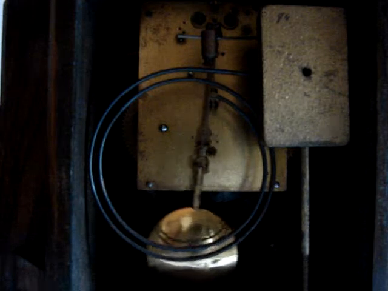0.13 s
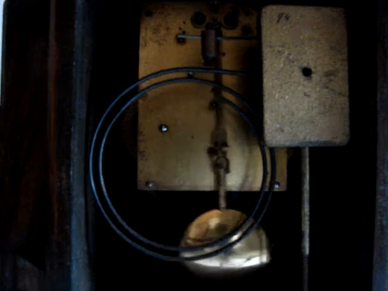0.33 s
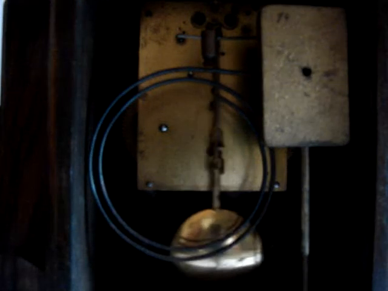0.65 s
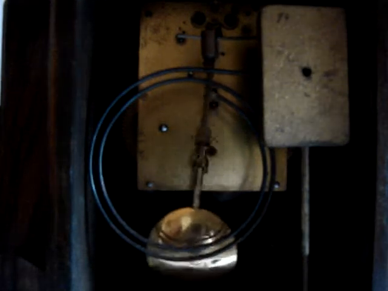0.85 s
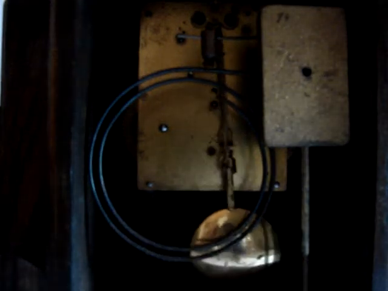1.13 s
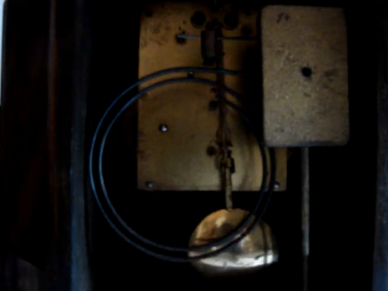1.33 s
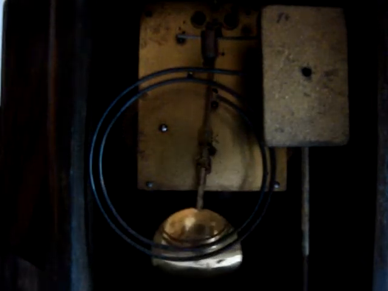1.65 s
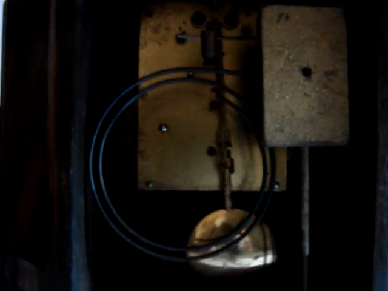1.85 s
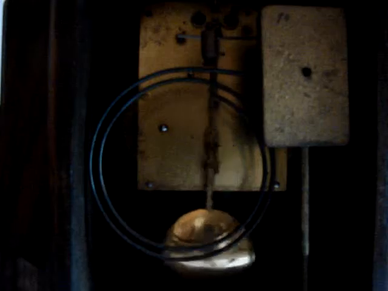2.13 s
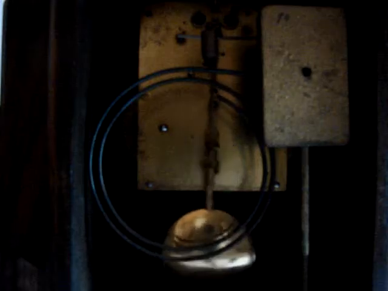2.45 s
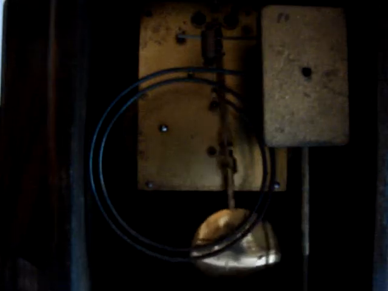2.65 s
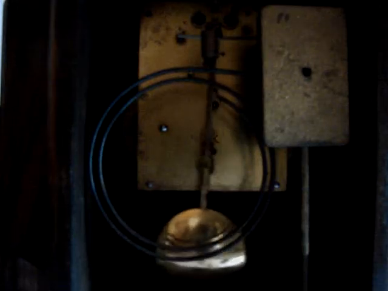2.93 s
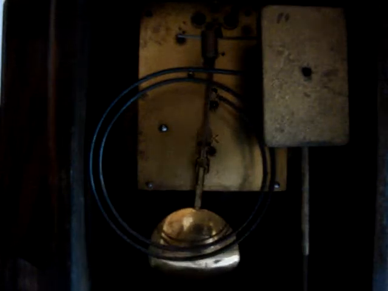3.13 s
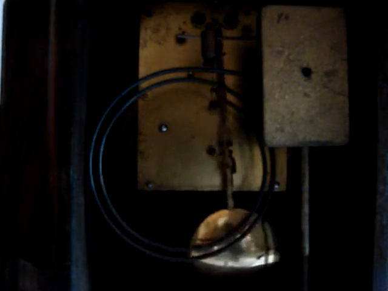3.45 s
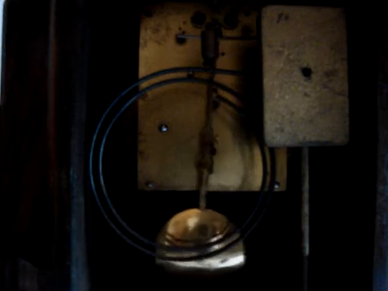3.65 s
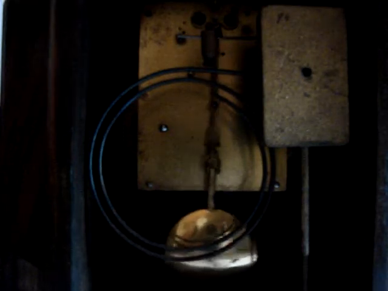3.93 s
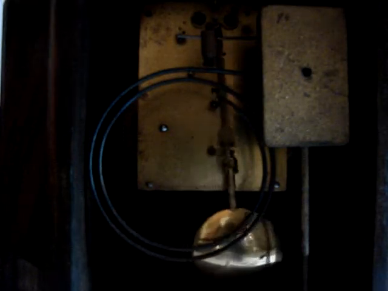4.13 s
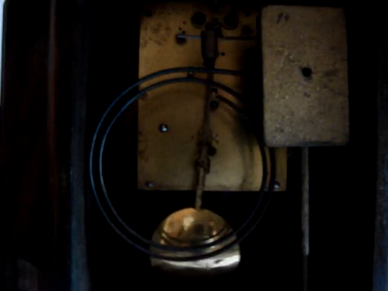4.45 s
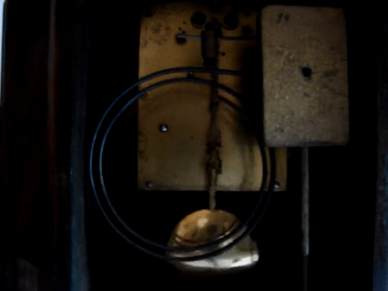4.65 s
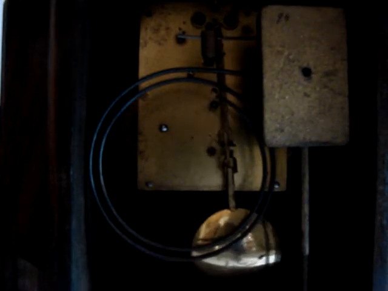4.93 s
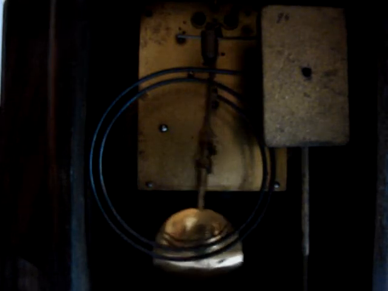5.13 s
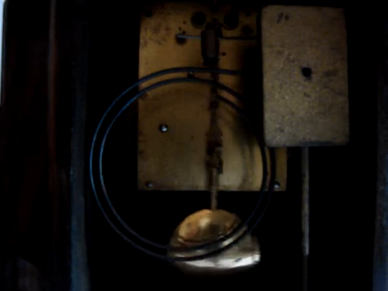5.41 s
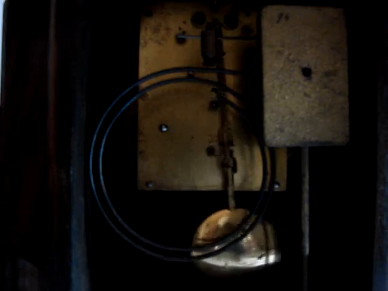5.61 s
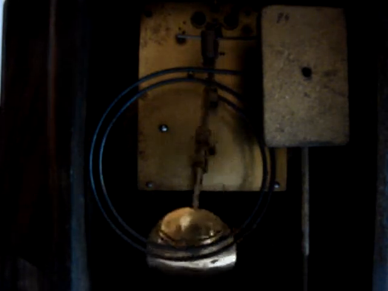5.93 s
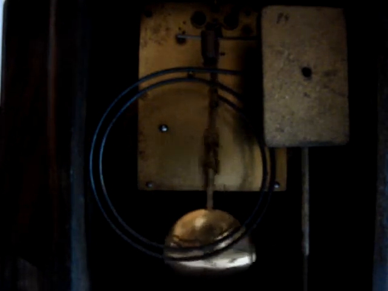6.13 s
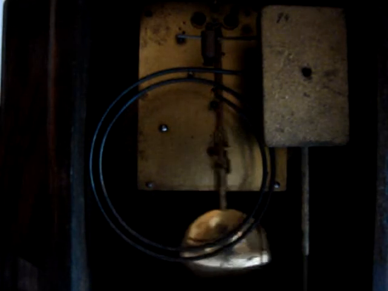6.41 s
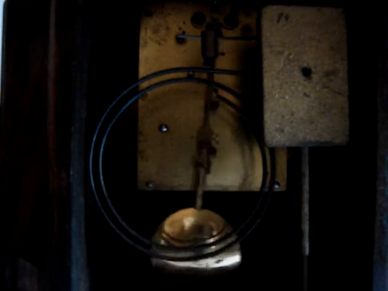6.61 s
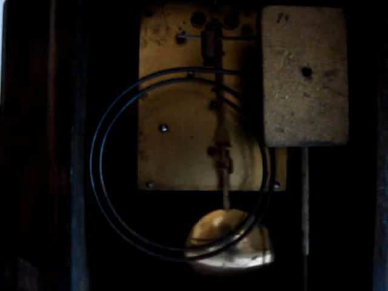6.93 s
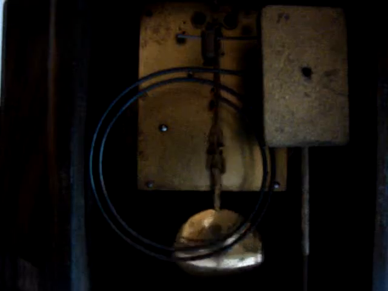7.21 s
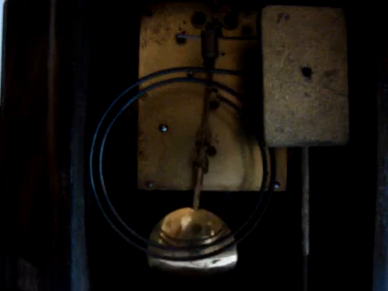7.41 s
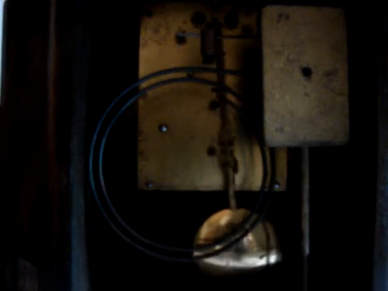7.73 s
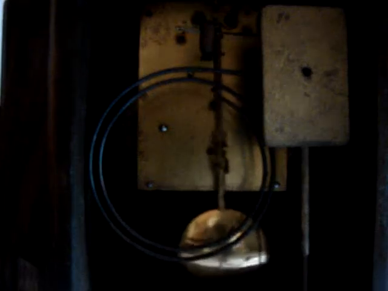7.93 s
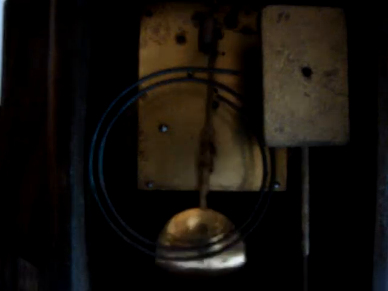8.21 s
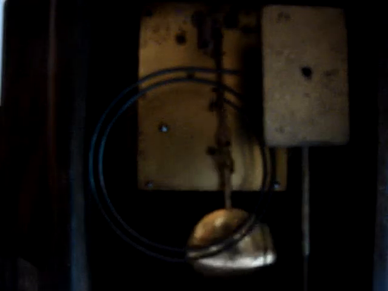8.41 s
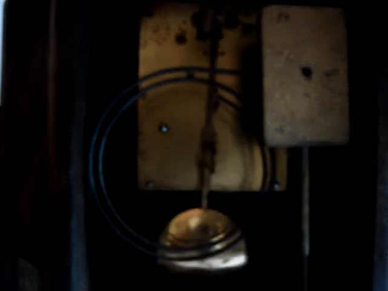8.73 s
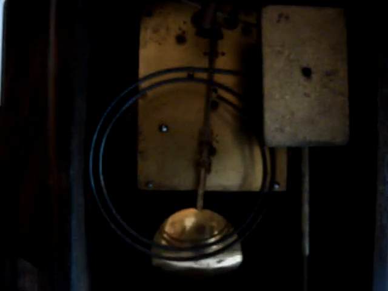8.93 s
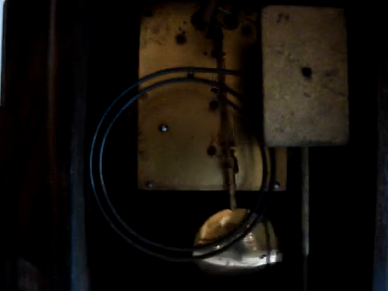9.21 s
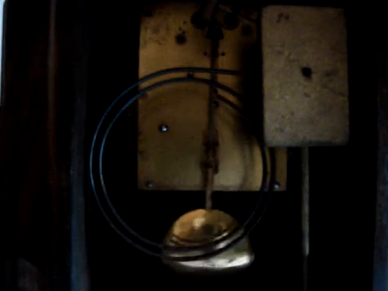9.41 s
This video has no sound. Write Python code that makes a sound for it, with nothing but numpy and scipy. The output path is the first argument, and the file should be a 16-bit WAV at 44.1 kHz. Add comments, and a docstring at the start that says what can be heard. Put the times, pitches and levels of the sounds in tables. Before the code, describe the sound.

A pendulum clock movement ticks and tocks steadily close by, with small lever clicks, until a strike train whirrs up over quiet room hum.

```python
"""A quiet room's low hum, microphone hiss and a thin whine; then an open pendulum clock movement ticks and tocks.
The escapement rings brass plate modes; levers ring them shorter and knock the hollow wooden case.
A small spring snaps with its own few modes, and dull bumps push the microphone's support near the end.
Late on the strike train whirrs up: uneven tooth scrapes and rubbing noise through wheel resonances.
Case and room answer the clock's blows with a short dull noise tail."""
import sys
import numpy as np
from scipy import signal
from scipy.fft import rfft, irfft, next_fast_len
from scipy.io import wavfile
from scipy.ndimage import map_coordinates

SR = 44100
rng = np.random.default_rng(int(sys.argv[2]) if len(sys.argv) > 2 else 0)


def materialize(psi):
    """Save the field psi as 16-bit PCM at rate SR to the path in sys.argv[1].

    A 1-D psi becomes a single channel; in a 2-D psi each row is a channel.
    """
    bounded = np.clip(np.atleast_2d(psi).T, -1, 1)
    quanta = np.round(bounded * 32767).astype(np.int16)
    wavfile.write(sys.argv[1], SR, quanta)


def to_linear_factor(level_db):
    """Convert decibel levels (scalar or array-like) to linear amplitude factors."""
    exponent = np.asarray(level_db, float) / 20
    return 10 ** exponent


N = 422037


def unit(x):
    """Scale to rms 1."""
    return x / np.sqrt(np.mean(x ** 2) + 1e-20)


def peak_one(x):
    """Scale to peak 1."""
    return x / np.abs(x).max()


def along(points, hz):
    """Interpolate (hz, value) points on a log frequency axis."""
    point_hz, value = np.transpose(points)
    return np.interp(np.log(hz + 1), np.log(point_hz + 1), value)


def wobble(knots_per_s):
    """A smooth random curve."""
    knots = rng.standard_normal(int(N * knots_per_s / SR) + 4)
    return map_coordinates(knots, [np.arange(N) * knots_per_s / SR])


def filtered(x, response):
    """Multiply the spectrum by a complex response of frequency."""
    m = next_fast_len(N + SR // 2)
    return irfft(rfft(x, m) * response(np.fft.rfftfreq(m, 1 / SR)), m)[..., :N]


def resonances(peaks):
    """Causal response of (hz, width_hz, level_db) resonances, alternating in sign."""
    def response(f):
        total = 0
        for k, (hz, width_hz, level_db) in enumerate(peaks):
            loss = 1j * f * width_hz
            total = total + (-1) ** k * to_linear_factor(level_db) * loss / (hz * hz - f * f + loss)
        return total
    return response


def rings(hz, level_db, t60_s, scatter_db):
    """One decaying sine per mode, each at a new strength, sign and slightly new pitch."""
    t = np.arange(SR // 4) / SR
    strength, detune, sign = rng.standard_normal((3, len(hz), 1))
    decay_db = -60 * t / t60_s[:, None]
    size = np.sign(sign) * to_linear_factor(level_db[:, None] + scatter_db * strength + decay_db)
    return size * np.sin(2 * np.pi * hz[:, None] * (1 + 0.0054 * detune) * t)


def add(track, start_s, sound):
    """Mix a sound in at a time."""
    track[round(start_s * SR):][:len(sound)] += sound


def contacts(chatter_db, chatter_s, lead_s, fade_db=12):
    """Impulses: a faint first touch, the blow, then a fading shiver of rebounds."""
    delay, size = rng.random((2, 24))
    out = np.zeros(SR // 16)
    rebound_s = np.clip(lead_s + delay * chatter_s, 0, .06)
    out[(rebound_s * SR).astype(int)] = to_linear_factor(chatter_db - fade_db * delay) * (2 * size - 1) ** 3
    out[0] = 0.31
    out[round(abs(lead_s) * SR)] = 1
    return out


# hum colour: pitch_hz, density_db_per_hz (relative)
HUM_TILT = [(20, -120), (28, -11.5), (60, -12), (90, -9.5), (200, -8.5), (500, -8.5), (950, -14),
            (1150, -18.5), (2500, -29), (4000, -120)]
# hum resonances: pitch_hz, width_hz, level_db (relative)
HUM_PEAKS = [(124.2, 48, 5.5), (286.2, 50, 8.5), (741.7, 65, 8), (914, 82, 5.5), (2020, 100, 11.5)]
HUM_DB = -49


def room():
    """Noise shaped to a low hum with a few hollow resonances, swelling a little."""
    def colour(f):
        peaks = sum(to_linear_factor(db) / (1 + (2 * (f - hz) / width_hz) ** 2) for hz, width_hz, db in HUM_PEAKS)
        return to_linear_factor(along(HUM_TILT, f)) * (1 + peaks)
    swell_db = 1.1 * wobble(6) + .8 * wobble(1.5)
    return to_linear_factor(HUM_DB + swell_db) * unit(filtered(rng.standard_normal(N), colour))


# microphone hiss: pitch_hz, density_db_per_hz (relative)
HISS = [(200, -120), (600, 2.5), (1300, 3), (3000, 1), (4000, 0), (6000, -2.5), (7200, -3.5), (7870, 0.5),
        (8500, -6), (9900, -8)]
HISS_DB = -54


def hiss():
    """Steady microphone noise, coloured by the table."""
    return to_linear_factor(HISS_DB) * unit(filtered(rng.standard_normal(N), lambda f: to_linear_factor(along(HISS, f))))


WHINE_HZ, WHINE_RMS_DB = 7867, -71.5


def whine():
    """A thin electronic sine, wavering in level and phase."""
    level = to_linear_factor(WHINE_RMS_DB + 3 + 2 * wobble(8))  # 3 dB from rms to sine peak
    return level * np.sin(2 * np.pi * WHINE_HZ * np.arange(N) / SR + .6 * wobble(8))


# plate modes: pitch_hz, t60_s (before damping), tick_pallet_db, tock_pallet_db, levers_db
PLATE = [(1315, 0.14, -9, -27, -6), (1570, 0.23, -11, -12.5, -21), (1885, 0.15, 0.5, -9, -17),
         (2057, 0.18, 1, 3, -28), (2137, 0.062, 1, 0.5, -12), (2320, 0.13, -3.5, -3.5, -10),
         (2529, 0.072, 4, 2.5, 6), (2635, 0.047, 9.5, 7.5, -28), (2967, 0.066, -11, -4.5, -6),
         (3343, 0.1, -6, -10, -6), (3740, 0.024, -0.5, 8, 14), (3870, 0.081, -14, -22, -6),
         (4330, 0.047, -18, -26, -32.5), (4550, 0.13, -2.5, -5.5, -9), (4940, 0.022, -14.5, -10.5, 3),
         (4750, 0.18, -11.5, 1, -21), (5200, 0.021, -29.5, -29, -12), (5820, 0.017, -24, -50, -27),
         (6070, 0.082, -28, -37, -17.5), (6860, 0.04, -28, -10.5, -48), (6890, 0.022, -8.5, -21.5, -18.5),
         (7250, 0.033, -22, 10.5, -3.5), (7620, 0.063, -34, -3.5, -33), (8580, 0.042, -17, 7, -16),
         (8600, 0.026, -38, -48, -33), (9760, 0.011, -14, -71, -19)]
# borders of the low, middle, upper and high modes: pitch_hz
ZONES_HZ = [3150, 4400, 5700]


def plate_blow(point, zones_db, damping, chatter_db, chatter_s, lead_s, fade_db, clatter_hz, low_hz, grip):
    """A blow on the plates: modes over a dense clatter, led in by a touch and restruck by small rebounds."""
    hz, t60_s, *points_db = np.transpose(PLATE)
    # a small contact hardly moves the lowest modes
    mode_db = points_db[point] + 20 * np.log10(1 / (1 + (low_hz / hz) ** 4))
    # a resting part damps the high modes most
    t60_s = damping * t60_s * np.where(hz > ZONES_HZ[2], grip, 1)
    modes = rings(hz, mode_db, t60_s, scatter_db=3.5)
    # every mode has a weaker neighbour, from the second plate
    modes = modes + rings(1.018 * hz, mode_db - 6.5, t60_s, scatter_db=3.5)

    # countless weak modes of wheels and arbors fill the gaps
    t = np.arange(modes.shape[1]) / SR
    f = np.fft.rfftfreq(len(t), 1 / SR)
    bands = np.searchsorted(ZONES_HZ, f) == np.arange(len(zones_db))[:, None]
    bands = bands / (1 + (clatter_hz / (f + 1)) ** 4)
    clatter = irfft(rfft(rng.standard_normal(len(t))) * bands, len(t)) * to_linear_factor(-60 * t / (damping * .12))

    zone = np.searchsorted(ZONES_HZ, hz)
    ring = np.zeros(len(t))
    for k, db in enumerate(zones_db):
        ring += to_linear_factor(db) * (peak_one(modes[zone == k].sum(0)) + 0.66 * peak_one(clatter[k]))
    ring *= 1 - np.exp(-t / 0.00044)  # the contact takes a moment to build
    blow = signal.fftconvolve(ring, contacts(chatter_db, chatter_s, lead_s, fade_db))
    return blow * np.linalg.norm(ring) / np.linalg.norm(blow)  # rebounds share out the same energy


# beats, tick and tock in turn: start_s, level_db, brightness_db
BEATS = [(0.1378, -18.5, 2), (0.4646, -21, 2.5), (0.8686, -22.5, 1.5), (1.1942, -23.5, 3),
         (1.597, -20, -1.5), (1.921, -24, 3.5), (2.3266, -22, -0.5), (2.6507, -23.5, -1), (3.055, -21, -3),
         (3.3807, -22, -3), (3.7821, -22.5, -1), (4.1067, -22, 1.5), (4.5054, -19, 2), (4.8286, -16.5, 0),
         (5.231, -15.5, -4), (5.5538, -17, 1), (5.956, -20, 1.5), (6.2816, -17.5, 1), (6.6817, -19.5, -1),
         (7.008, -19.5, -1.5), (7.4094, -20, 1.5), (7.7378, -22.5, -1), (8.1367, -21, 2.5),
         (8.4617, -18, 1), (8.8626, -22.5, 1.5), (9.1903, -21.5, 4)]
# low, middle, upper and high modes under each pallet: level_db (re the beat)
TICK_DB = [-3.5, -8, -12.5, -12]
TOCK_DB = [-4, -12.5, -12, -3.5]
# share of a beat's brightness that each of the four groups takes: ratio
BRIGHTENS = [0, .1, .8, 1.1]


def escapement():
    """A wheel tooth drops on the tick pallet, then on the tock pallet, and shivers there."""
    out = np.zeros(N + SR)
    for k, (start_s, level_db, bright_db) in enumerate(BEATS):
        pallet_db = np.array([TICK_DB, TOCK_DB][k % 2])
        zones_db = level_db + pallet_db + bright_db * np.array(BRIGHTENS)
        blow = plate_blow(k % 2, zones_db, damping=0.47, chatter_db=1.5, chatter_s=.036, lead_s=.0008,
                          fade_db=27, clatter_hz=1530, low_hz=900, grip=1.0)
        add(out, start_s, blow)
    return out[:N]


def echo(x, t60_s=0.38):
    """Case and room answer with a short dull noise tail, drawn anew for every 50 ms of sound."""
    t, wet, block = np.arange(SR // 3) / SR, np.zeros(N + SR), SR // 20
    for start in range(0, N, block):
        tail = to_linear_factor(-60 * t / t60_s) * rng.standard_normal(len(t))
        add(wet, start / SR, signal.fftconvolve(x[start:start + block], tail / np.linalg.norm(tail)))
    return filtered(wet[:N], lambda f: 1 / (1 + 1j * f / 4000))


# lever contacts: start_s, ring_db, brightness_db, case_knock_db
LEVERS = [(0.2035, -30.5, -4, -25), (0.944, -45, 8.5, -33.5), (1.132, -47, -7, -33.5),
          (1.884, -40, -8, -26), (2.018, -32.5, -7, -24), (2.044, -36, -4, -34), (2.97, -48, -14, -36.5),
          (3.936, -58, -3, -35.5), (4.047, -55, 0, -43), (4.139, -41, -3, -26.5), (4.171, -26, 1, -19),
          (4.194, -40, 7, -27), (4.344, -48, -4, -35), (5.175, -47, 11.5, -37), (5.2372, -18, 8, -30),
          (5.245, -32, -18, -33.5), (6.861, -40, -1, -54.5), (6.888, -22, 2, -38), (6.8928, -7.5, -4, -24),
          (6.899, -15, -21, -22), (6.9175, -16.5, 0, -26), (6.94, -24.5, 0, -29), (6.953, -32.5, -4, -33)]
# the four mode groups at brightness 0: level_db (re the ring)
LEVER_DB = [-1, -3, -5.5, -3.5]
# share of a lever's brightness that each group takes: ratio
LEVER_BRIGHTENS = [0, 1.1, .9, .6]
# hollow case modes: pitch_hz, level_db (relative), t60_s
CASE = [(175, -20, .12), (235, -16, .12), (282, -12, .13), (322, -8, .11), (359, 0, .145), (395, -9, .11),
        (452, -7, .13), (618, -15, .3), (730, -17, .08), (1040, -26, .08), (1475, -18, .07)]
# back panel modes gain (or lose) PANEL_GROWS dB per dB of ring above (or below) PANEL_FROM_DB
PANEL_HZ, PANEL_FROM_DB, PANEL_GROWS = 670, -24, .6


def levers():
    """Levers press on the plate while they hit, so it rings short; the push also knocks the case."""
    out, (hz, mode_db, t60_s) = np.zeros(N + SR), np.transpose(CASE)
    t = np.arange(SR // 4) / SR
    wood_band = signal.butter(2, [450, 1800], "band", fs=SR, output="sos")
    for start_s, ring_db, bright_db, case_db in LEVERS:
        zones_db = ring_db + np.array(LEVER_DB) + bright_db * np.array(LEVER_BRIGHTENS)
        blow = plate_blow(2, zones_db, damping=0.27, chatter_db=-15, chatter_s=0.017, lead_s=0.0023,
                          fade_db=23, clatter_hz=1540, low_hz=1900, grip=0.63)
        add(out, start_s, blow)
        panel_db = PANEL_GROWS * (ring_db - PANEL_FROM_DB) * (abs(hz - PANEL_HZ) < 100)
        knock = rings(hz, mode_db + panel_db, t60_s, scatter_db=2).sum(0)
        thud = signal.sosfilt(wood_band, rng.standard_normal(len(t)))
        knock = knock + peak_one(thud) * to_linear_factor(-5 - 60 * t / .09)  # many weak wood modes, soon gone
        add(out, start_s + 0.00152, to_linear_factor(case_db) * knock * (1 - np.exp(-t / 0.00092)))
    return out[:N]


# a small spring snaps over a pin: start_s, peak_db, low_modes_db (added to the low modes)
SNAPS = [(1.797, -32.5, -8), (1.897, -39, -9), (1.9865, -34, -1), (1.9918, -35, 1), (2.004, -25.5, -3),
         (2.016, -17.5, -11), (3.307, -20.5, -17)]
# spring modes: pitch_hz, level_db (relative), t60_s
SPRING = [(1840, -2, 0.048), (2165, -0.5, .04), (2470, -4, 0.026), (3460, -18, 0.021), (3820, 1.5, 0.025),
          (4000, -8, 0.055), (6200, -14.5, 0.024), (7100, -15, 0.024), (9300, -21, 0.017)]


def spring():
    """Each snap rings the spring's own few modes, with a brief scratch."""
    out, (hz, mode_db, t60_s) = np.zeros(N + SR), np.transpose(SPRING)
    for start_s, peak_db, low_db in SNAPS:
        ring = rings(hz, mode_db + low_db * (hz < ZONES_HZ[0]), t60_s, scatter_db=2.5).sum(0)
        t = np.arange(len(ring)) / SR
        scratch = np.diff(rng.standard_normal(len(t) + 1)) * to_linear_factor(-11 - 60 * t / 0.012)
        ring = (ring + scratch) * (1 - np.exp(-t / 0.00025))
        snap = signal.fftconvolve(ring, contacts(-7, .008, 0.00087))
        add(out, start_s, to_linear_factor(peak_db) * peak_one(snap))
    return out[:N]


# what the wheel teeth ring with: pitch_hz, width_hz, level_db (relative)
WHEELS = [(1890, 2300, -4), (2536, 28, 10), (2940, 110, -1.5), (3330, 58, 5), (3840, 240, 3.5),
          (4340, 180, -14), (5300, 130, -18), (6300, 1700, -31), (8100, 6000, -43)]
TRAIN_START_S, TRAIN_RUN_UP_S, TRAIN_DB = 6.91, 0.35, -48


def train(teeth_per_s=101, turn_hz=25.14):
    """Pinion teeth meet at an uneven pace, harder once each turn, over the rubbing of the pivots."""
    count = int(N / SR * 100)
    slip, size = rng.standard_normal((2, count))
    meet_s = (np.arange(count) + 0.068 * slip) / teeth_per_s
    meet_db = 2.2 * size + 2.8 * np.sin(2 * np.pi * turn_hz * meet_s)
    taps = np.bincount(np.clip(meet_s * SR, 0, N - 1).astype(int), to_linear_factor(meet_db), N)
    # each meeting is a short scrape
    scrapes = signal.fftconvolve(taps, np.exp(-np.arange(SR // 50) / SR / 0.00094))[:N]
    running_s = np.clip(np.arange(N) / SR - TRAIN_START_S, 0, None)
    run_up = (1 - np.exp(-running_s / TRAIN_RUN_UP_S)) ** 2  # loudness only; the tooth rate is steady
    rub = (unit(scrapes) + 1.04 * to_linear_factor(0.51 * wobble(20))) * rng.standard_normal(N)
    return to_linear_factor(TRAIN_DB) * run_up * unit(filtered(rub, resonances(WHEELS)))


# dull bumps against the microphone's support: start_s, level_db (before the low cut)
BUMPS = [(7.999, -23.5), (8.073, -39)]
BUMP_HZ, JUDDER_S, JUDDER_DB = 160, 0.0087, -4  # each bump judders three more times


def bumps():
    """Soft low pushes that barely ring, thinned by a 70 Hz low cut."""
    out, t = np.zeros(N + SR), np.arange(SR // 8) / SR
    push = peak_one(np.sin(2 * np.pi * BUMP_HZ * t) * t * np.exp(-t / 0.0014))
    for start_s, level_db in BUMPS:
        for k in range(4):
            add(out, start_s + k * JUDDER_S, to_linear_factor(level_db + k * JUDDER_DB) * push)
    return filtered(out[:N], lambda f: (1j * f / (70 + 1j * f)) ** 2)


def scene():
    """The clock with its echo, the strike train, the bumps and the room."""
    clock = escapement() + levers() + spring()
    return (clock + to_linear_factor(-15) * echo(clock) + train() + bumps() + room())[None]


def roll_off(x):
    """The treble ends steeply here."""
    return signal.sosfilt(signal.butter(12, 10630, fs=SR, output="sos"), x)


TOP_HZ = 10000


def record(dry):
    """The microphone adds hiss and a whine, and cuts steeply above its band limit."""
    mix = filtered(dry + hiss() + whine(), lambda f: 1 / (1 + (f / TOP_HZ) ** 120))
    return roll_off(mix)


dry = scene()
out = record(dry)
materialize(out)
```